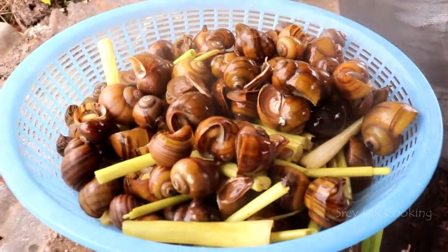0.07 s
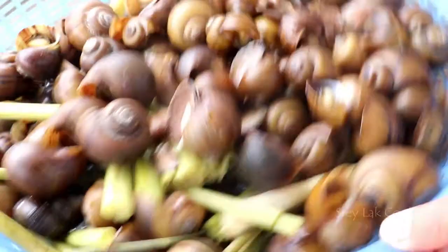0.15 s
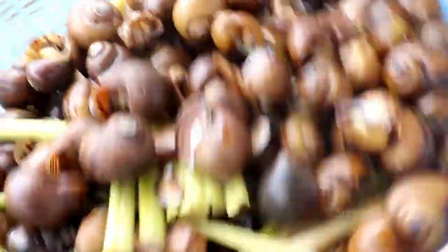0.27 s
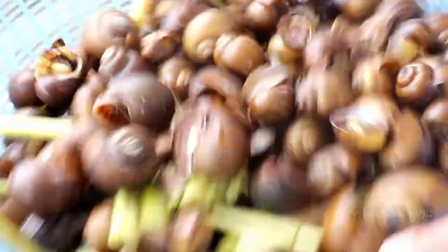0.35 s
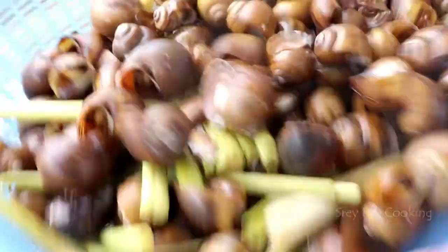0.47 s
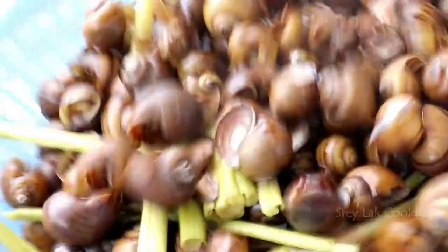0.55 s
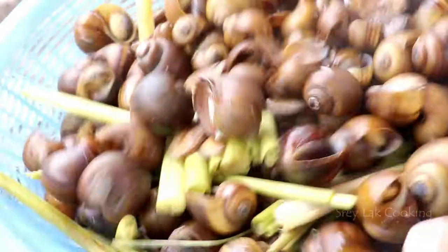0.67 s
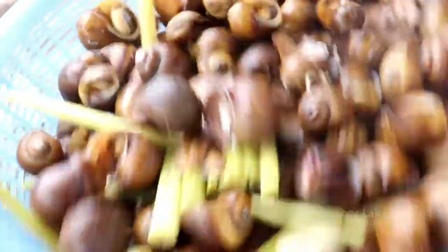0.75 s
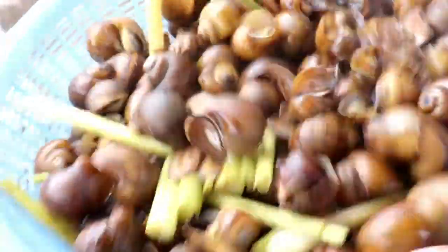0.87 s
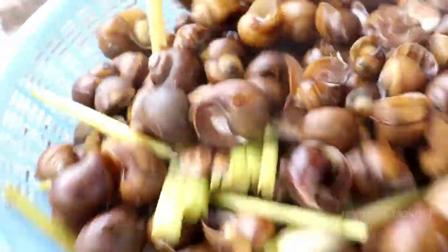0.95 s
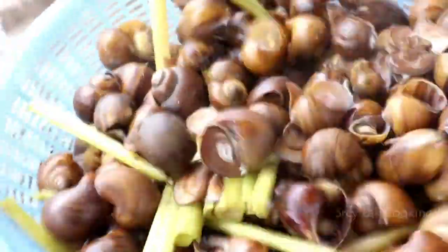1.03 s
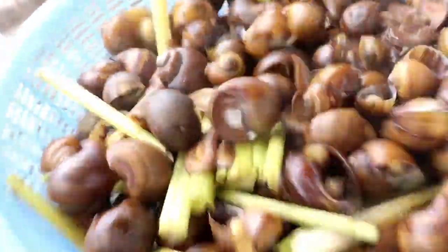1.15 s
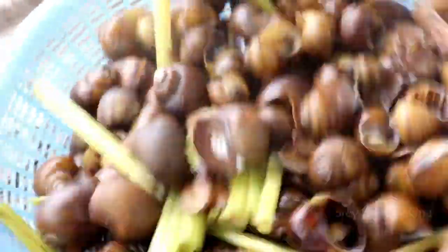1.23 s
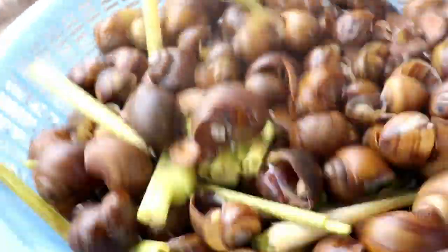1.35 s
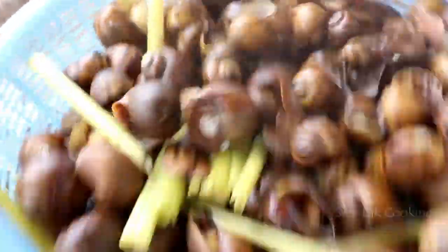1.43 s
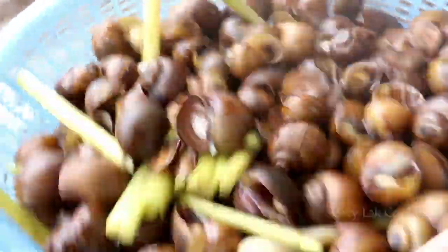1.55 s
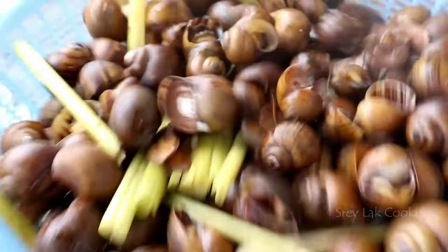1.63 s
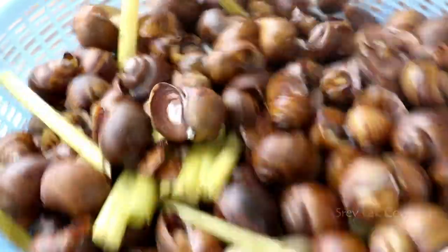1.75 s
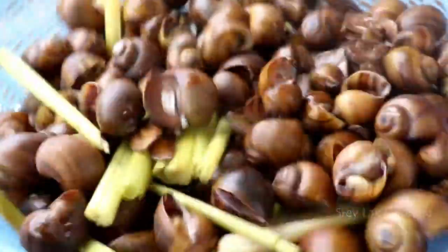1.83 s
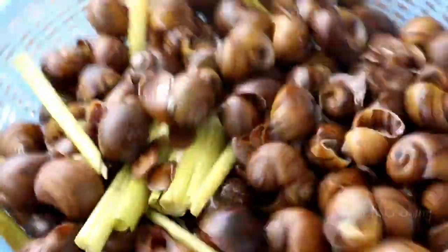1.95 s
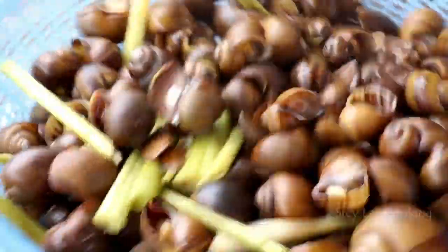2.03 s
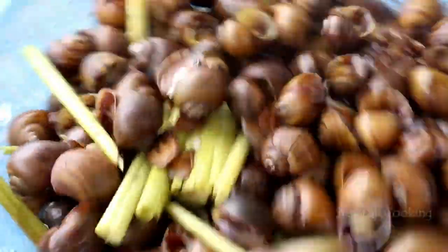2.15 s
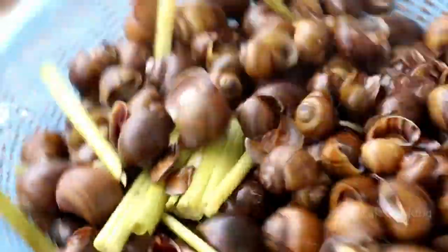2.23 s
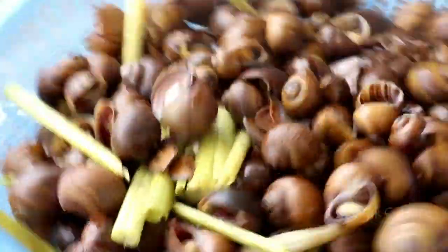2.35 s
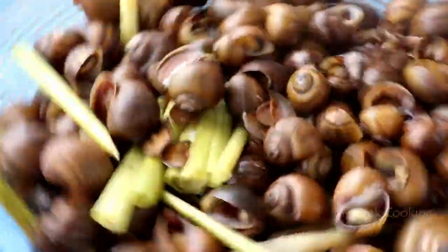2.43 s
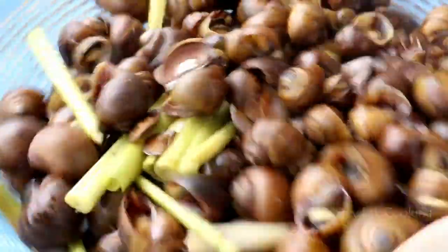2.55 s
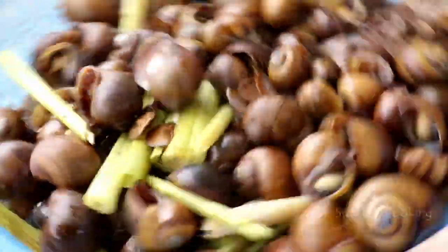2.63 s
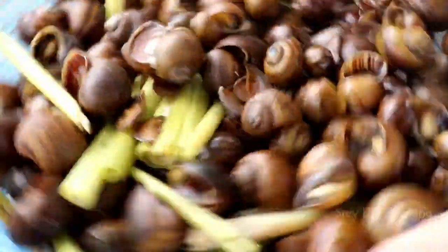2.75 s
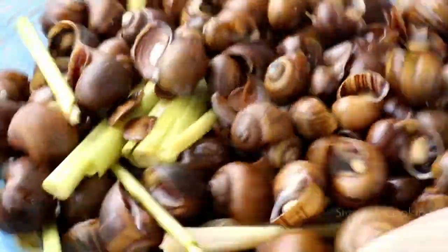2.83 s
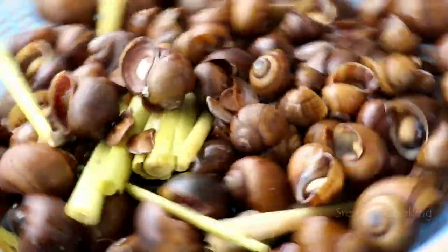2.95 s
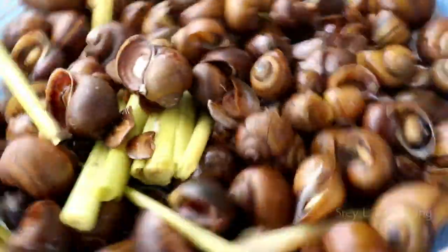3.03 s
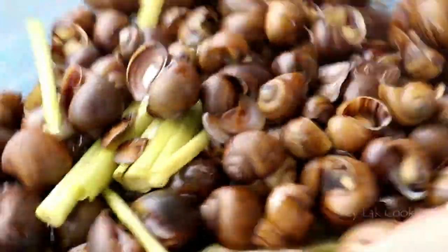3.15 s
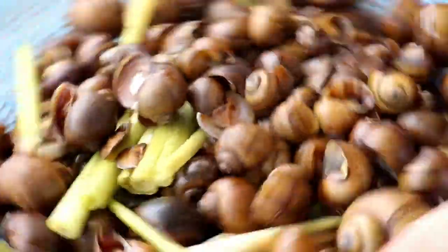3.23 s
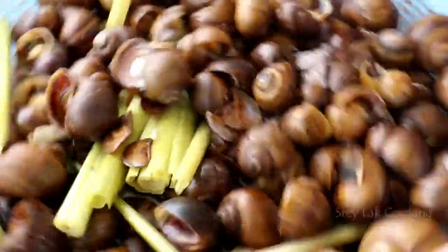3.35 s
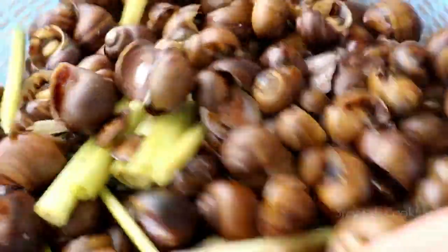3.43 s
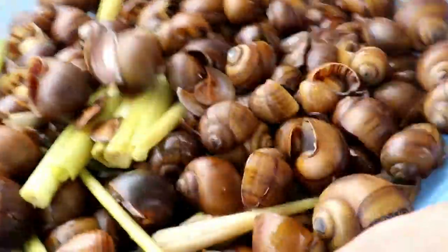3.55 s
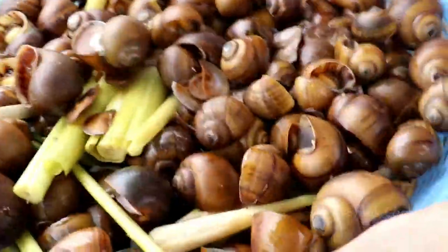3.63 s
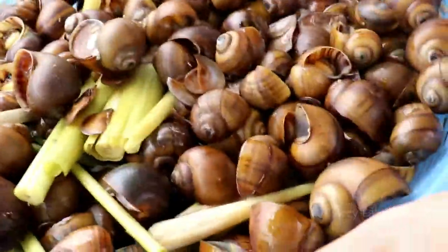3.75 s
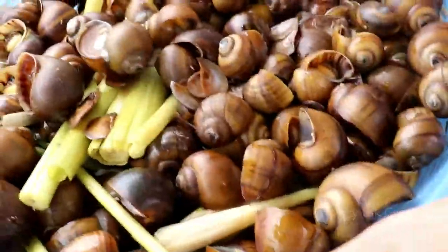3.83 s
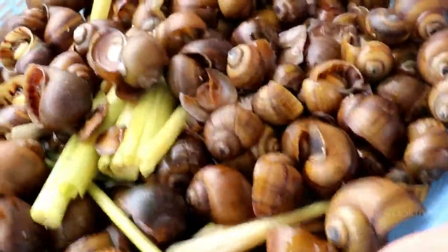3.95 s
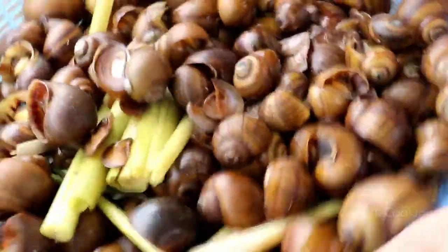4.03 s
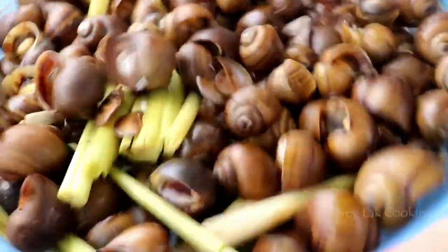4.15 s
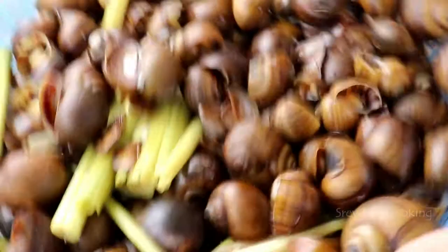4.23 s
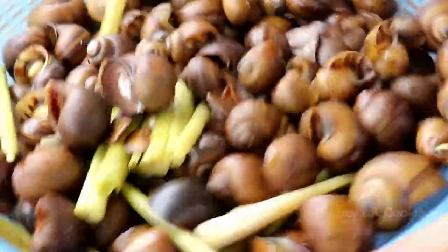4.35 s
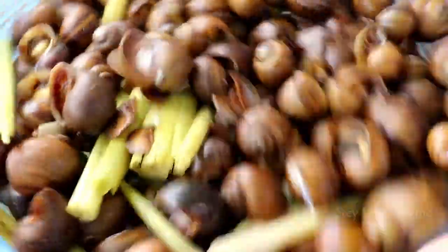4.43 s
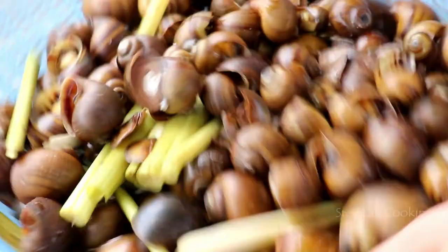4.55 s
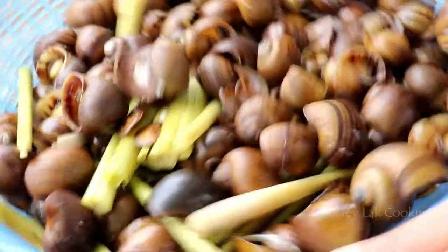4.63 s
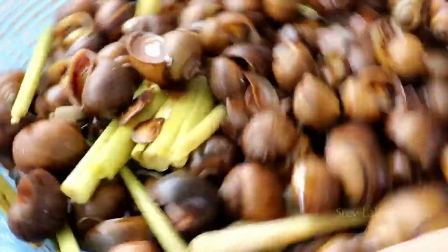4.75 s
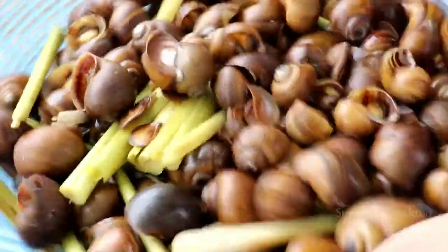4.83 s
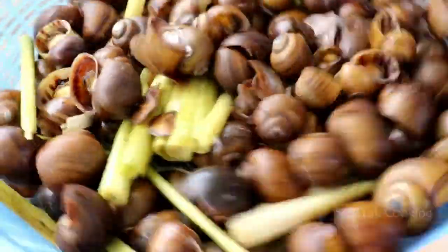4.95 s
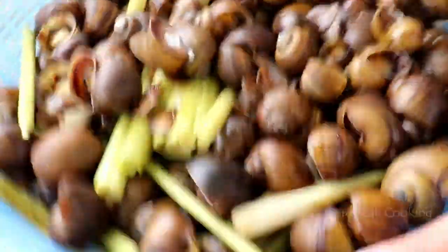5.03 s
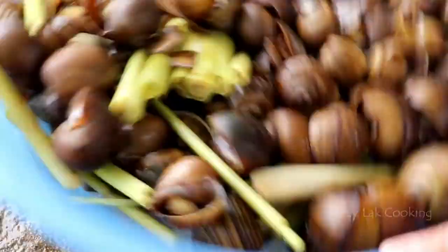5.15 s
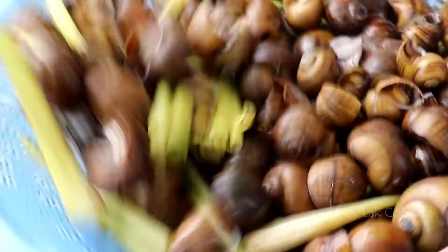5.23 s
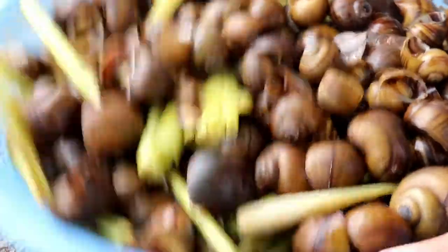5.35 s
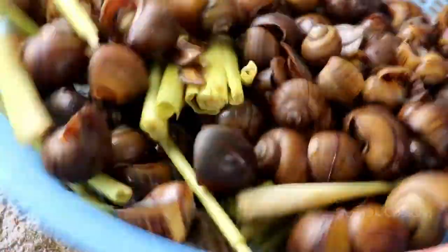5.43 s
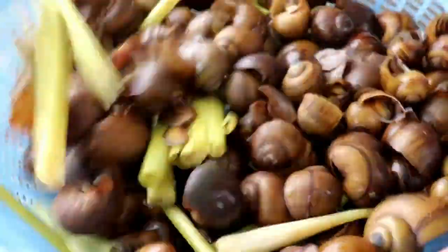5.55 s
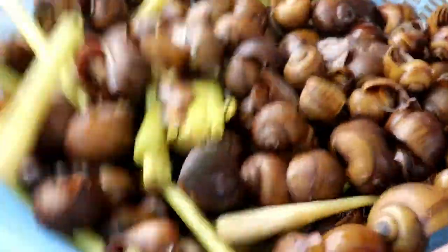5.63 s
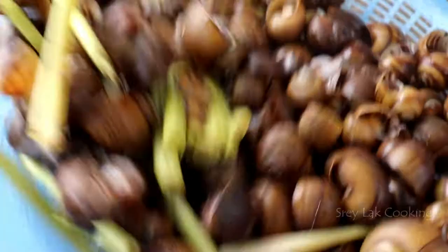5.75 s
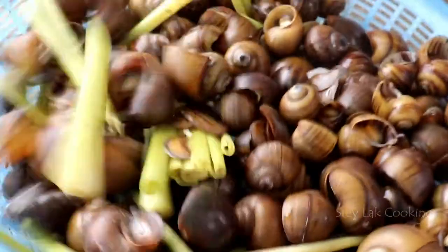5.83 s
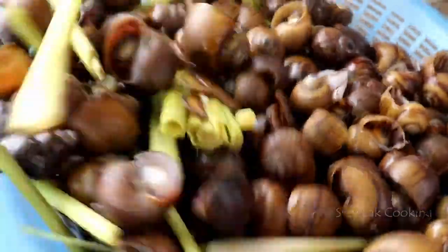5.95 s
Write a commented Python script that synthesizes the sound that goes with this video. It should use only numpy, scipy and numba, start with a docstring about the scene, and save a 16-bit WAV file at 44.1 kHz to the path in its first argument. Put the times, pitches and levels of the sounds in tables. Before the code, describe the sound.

Hollow snail shells rattle and scrape in rhythmic shakes in a plastic colander outdoors, pause while a distant bird hoots, then get tossed.

```python
"""Snail shells in a colander

Boiled snail shells slide out of a pot into a plastic colander, which is rocked, rested and then tossed.
Each stroke sets the heap sliding: random knocks ring damped sines for hollow shells, thin lips and plastic.
Denser knocks make a scrape, and hard clacks stand out on top. Filtered noise gives the outdoor air;
a distant bird hoots in the pause and a small one chirps, both as gliding, nearly pure tones."""
import sys
import numpy as np
from scipy import signal
from scipy.fft import rfft, irfft, next_fast_len
from scipy.io import wavfile
from scipy.ndimage import uniform_filter1d
from numba import njit

SR = 44100
rng = np.random.default_rng(int(sys.argv[2]) if len(sys.argv) > 2 else 0)


def dump(signal):
    """Clip the signal to [-1, 1] and save it as 16-bit WAV at the path in sys.argv[1]."""
    limited = np.clip(np.atleast_2d(signal).T, -1, 1)
    pcm = np.round(limited * 32767).astype(np.int16)
    wavfile.write(sys.argv[1], SR, pcm)


N = 263718  # length [samples]

# rocks of the colander, each a push and a return:
# (start [s], return follows after [s], push level [dB], return level [dB])
ROCKS = [(.051, 0.11, -21, -19.5), (.288, 0.12, -20, -20), (.528, 0.12, -21, -21.5),
         (.795, .118, -21.5, -22), (1.0, .13, -23.5, -22), (1.224, 0.11, -18.5, -18.5),
         (1.466, 0.1, -20, -19), (1.682, 0.11, -21, -20.5), (1.935, 0.11, -19, -19),
         (2.195, 0.14, -19.5, -20), (2.495, 0.14, -20, -19.5), (2.818, 0.14, -20, -19.5),
         (3.13, .112, -20, -20), (3.408, 0.088, -19, -27), (4.095, 0.14, -27, -19), (4.352, 0.15, -20, -20),
         (4.621, 0.14, -19.5, -21.5), (4.89, .15, -21, -39)]
# tilts, where shells keep rolling without a stop: (start [s], length [s], level [dB])
TILTS = [(.055, .9, -24), (1.0, .3, -27), (2.55, .36, -26.5), (4.04, 0.061, -33), (4.72, .24, -23.5)]
# tosses, the whole heap landing at once: (landing [s], length of the spill [s], level [dB])
TOSSES = [(5.163, 0.13, -19.5), (5.492, .087, -17.5), (5.757, .085, -17.5)]
# clacks that stand out: (time [s], strength of the blow [dB], shell pitch [Hz])
HARD_CLACKS = [(.064, -1, 1670), (.24, 0.5, 1880), (.447, -1, 2300), (.753, 0.5, 2660), (.879, -2, 2602),
               (.975, 0, 1720), (1.077, -2.5, 2520), (1.172, 3, 3483), (1.363, -2, 2279),
               (1.481, -2.5, 2441), (1.699, -3, 3460), (1.838, 2.5, 7040), (1.936, -0.5, 4210),
               (2.479, -0.5, 4409), (2.585, -2, 3186), (2.679, -.5, 1391), (2.893, 5.5, 3228),
               (3.061, -1, 4466), (3.183, 1, 1589), (3.266, 0, 3077), (3.309, -0.5, 2480), (3.588, 0, 4320),
               (3.606, -6.5, 4487), (3.675, -14, 2750), (3.726, -14.5, 4246), (3.815, -27, 4100),
               (3.935, -22, 2043), (4.075, -10.5, 2167), (4.141, 2.5, 2485), (4.158, -6.5, 7200),
               (4.176, -3, 3530), (4.189, -6.5, 1856), (4.215, -1, 4070), (4.262, 0, 1621),
               (4.456, 2.5, 3701), (4.52, 0, 2640), (4.568, -4.5, 2098), (4.656, 1.5, 2500),
               (4.947, 1.5, 3734), (4.992, 1, 2021), (5.031, -5.5, 1597), (5.067, -7.5, 4080),
               (5.171, 0, 1320), (5.175, 0.5, 3780), (5.288, 3, 5100), (5.342, -5, 4547),
               (5.408, -18.5, 2320), (5.484, -12, 1108), (5.591, -1.5, 3441), (5.789, -0.5, 1494),
               (5.946, -9, 2770)]
# colour of the microphone: (frequency [Hz], gain [dB])
MIC_COLOUR = [(150, -7), (400, -1), (700, -3.5), (1000, -1), (1700, 0.5), (3000, 1), (4400, 2.5),
              (4950, -0.5), (5350, 3.5), (6100, -3), (7000, 1), (9500, -3), (12000, -2), (16000, 3.5)]
# hoots of a distant bird: (start [s], length [s], pitch before bending [Hz], level [dB])
HOOTS = [(3.557, 0.057, 1143, -33.5), (3.61, 0.058, 1010, -40), (3.756, 0.053, 960, -47),
         (3.842, 0.04, 1070, -36.5), (3.892, 0.053, 1012, -39.5)]
# faint chirps of a small bird: (start [s], length [s], pitch before bending [Hz], level [dB])
CHIRPS = [(3.833, 0.02, 5460, -60), (3.853, 0.016, 5570, -43), (3.96, .016, 5560, -60.5),
          (3.978, 0.021, 5630, -44)]
# spectrum of the outdoor air: (frequency [Hz], relative level per Hz [dB])
AIR_COLOUR = [(15, -9.5), (30, 3), (48, -4.5), (130, -10), (230, -15.5), (450, -23), (1000, -18.5),
              (3000, -29), (5500, -31.5), (6300, -38), (15000, -46.5)]
# swell of the outdoor rumble, before the gusts: (time [s], level [dB])
RUMBLE = [(0, -39.5), (.6, -45), (2, -44), (2.35, -38.5), (2.6, -43.5), (3.7, -39.5), (4.2, -38.5),
          (4.5, -46.5), (5.95, -47)]

# a slide fills this share of the time until the colander turns again; returns have a longest length
PUSH_SHARE, RETURN_SHARE, LONGEST_SLIDE_S = .8, .68, .115
# the push throws the shells against the plastic, the return rolls them over each other
# tone against the slide's level: (colander thud [dB], lip tinkle [dB])
PUSH_TONE_DB, RETURN_TONE_DB = (-11, -11.5), (-11, -10)
TILT_TONE_DB, TOSS_TONE_DB = (-12, -9.5), (-16, -11)
# the plastic knocks louder as the rocking widens, up to the full swing
THUD_DB_PER_S, FULL_SWING_S = 1.7, 1.5
# a toss first slaps the plastic (level against the toss), then the heap spills
SLAP_S, SLAP_DB, SLAP_TONE_DB = .0838, -3, (-2.5, -22)
SPILL_AFTER_S = .018
# lesser clacks within every slide: strength above the slide's level, and range of shell pitches
STRAY_DB, STRAY_SPREAD_DB, STRAY_LOW_HZ, STRAY_HIGH_HZ = 14, .5, 1810, 4700
STRAY_AFTER_S = .02  # the shells must gather speed before they clack
HISS_DB, TOP_HZ = -46.5, 15900


def clatter():
    """Hollow shells clack, their thin lips tinkle, and the plastic underneath knocks dully."""
    _, _, db, thud_db, tinkle_db = slides().T
    strength = motion(db)
    times, sizes = collisions(strength, rate=750, spread_db=2.5)
    hollow = bodies(times, sizes, low_hz=1466, high_hz=5300, cycles=7.4, push=1.24, count=2)
    lips = bodies(times, sizes, low_hz=7270, high_hz=9360, cycles=11, push=23.0, count=1)
    plastic = bodies(times, sizes, low_hz=740, high_hz=1560, cycles=5.4, push=.9, count=2)
    return (undb(-3.0) * driven(hollow, strength)
            + undb(-3) * driven(lips, motion(db + tinkle_db))
            + undb(0.5) * driven(plastic, motion(db + thud_db)))


def slides():
    """Every slide of the heap: (start [s], length [s], level [dB], colander thud [dB], lip tinkle [dB])."""
    rows = [(*tilt, *TILT_TONE_DB) for tilt in TILTS]
    next_starts = [stroke[0] for stroke in ROCKS[1:] + TOSSES[:1]]
    for (start, swing, push_db, return_db), next_start in zip(ROCKS, next_starts):
        turn = start + swing
        widening_db = np.array([THUD_DB_PER_S * min(start - FULL_SWING_S, 0), 0])
        rows.append((start, PUSH_SHARE * swing, push_db, *(widening_db + PUSH_TONE_DB)))
        # before a pause, the return lasts as long as the swing suggests
        paused = next_start - turn > 2 * LONGEST_SLIDE_S
        length = RETURN_SHARE * (swing if paused else next_start - turn)
        rows.append((turn, min(length, LONGEST_SLIDE_S), return_db, *(widening_db + RETURN_TONE_DB)))
    for landing, length, db in TOSSES:
        rows.append((landing, SLAP_S, db + SLAP_DB, *SLAP_TONE_DB))
        rows.append((landing + SPILL_AFTER_S, length, db, *TOSS_TONE_DB))
    return np.array(rows)


def motion(levels_db, rise_s=.018, stop_s=.027, arch=.3, creep_s=0.02597, settle_s=.065,
           loose_db=-12, rest_db=-68):
    """Strength of the sliding: a few shells creep ahead of each stroke, the heap swells and stops, a few settle."""
    power = np.full(N, undb(2 * rest_db))
    for (start, length, *_), db in zip(slides(), levels_db):
        first = max(int(start * SR) - SR // 10, 0)
        span = np.arange(first, min(int(start * SR) + SR // 2, N))
        age = span / SR - start
        early = np.maximum(-age, 0)
        late = np.maximum(age - length, 0)
        swell = 1 + arch * (np.sin(np.pi * np.clip(age / length, 0, 1)) - .5)
        slide = np.clip(age / rise_s, 0, 1) * swell * np.exp(-late / stop_s)
        loose = undb(loose_db) * np.exp(-early / creep_s - late / settle_s)
        power[span] += undb(2 * db) * (slide ** 2 + loose ** 2)
    return np.sqrt(power)


def collisions(strength, rate, spread_db):
    """Random knocks (times, sizes) with scattered hardness, thicker while the heap moves fast."""
    busy = np.minimum(strength / undb(-19), 1.3) ** .75
    at = np.flatnonzero(rng.random(N) < rate * busy / SR)
    hardness = np.clip(rng.standard_normal(len(at)), -2, 1.6)
    return at / SR, undb(spread_db * hardness)


def bodies(times, sizes, low_hz, high_hz, cycles, push, count):
    """Every knock rings a few modes of its own, since no two shells are the same size."""
    out = 0
    for _ in range(count):
        pitch, damping, share, lag = rng.random((len(times), 4)).T
        hz = low_hz * (high_hz / low_hz) ** pitch
        gain = sizes * (2 * share - 1) * np.sqrt(hz / low_hz)
        mode_cycles = cycles * 2 ** (damping - .5)
        # the two shells of a collision answer a moment apart
        out = out + rings(times + .0007 * lag, hz, mode_cycles, gain, float(push))
    return out


@njit
def rings(times, hz, cycles, size, push):
    """One damped sine a knock: it builds over `push` cycles and falls 60 dB in the given cycles."""
    out = np.zeros(N)
    for k in range(len(times)):
        start = int(times[k] * SR)
        step = min(hz[k] / SR, .45)  # cycles per sample
        pole = np.exp(step * (2j * np.pi - 6.9 / cycles[k]))
        z = size[k] + 0j
        for i in range(max(start, 0), min(N, start + int(cycles[k] / step))):
            z *= pole
            contact = min((i - start) * step / push, 1.)
            out[i] += z.imag * contact * contact * (3 - 2 * contact)
    return out


def driven(x, strength):
    """The energy of the slide is shared among the knocks that fall within some 30 ms."""
    size = SR // 32
    local = uniform_filter1d(uniform_filter1d(x ** 2, size), size)
    return x * strength / np.sqrt(np.abs(local) + 0.0083 * np.mean(x ** 2))


def grind():
    """Wet shells rub and scrape between the knocks: thousands of tiny slips a second, in short irregular runs."""
    _, _, db, _, tinkle_db = slides().T
    strength = motion(db)
    times, sizes = collisions(strength, rate=4000, spread_db=1.0)
    hollow = bodies(times, sizes, low_hz=1050, high_hz=5380, cycles=9, push=1.01, count=1)
    lips = bodies(times, sizes, low_hz=6660, high_hz=10720, cycles=21.4, push=3.0, count=1)
    runs_db = 4.5 * walk(220)
    lip_runs_db = 8.86 * np.minimum(walk(160), 2)
    scrape = driven(hollow, strength) + driven(lips, motion(db + tinkle_db)) * undb(lip_runs_db)
    return undb(runs_db - 8.5) * scrape


def pings():
    """Now and then a free lip rings on for a moment."""
    _, _, db, _, tinkle_db = slides().T
    strength = motion(db + tinkle_db, loose_db=-5.5)
    times, sizes = collisions(strength, rate=38, spread_db=1.0)
    sizes = sizes * strength[(times * SR).astype(int)]
    return undb(14) * bodies(times, sizes, low_hz=6900, high_hz=10200, cycles=130, push=8, count=1)


def clacks(hits):
    """A hard blow: one shell rings at its own pitch and rebounds, with a brief crack and its neighbour's modes."""
    times, db, hz = (column.copy() for column in hits.T)
    size = undb(db)
    lip = hz > 6000
    cycles = 13 * (hz / 3000) ** 0.45 + 45 * lip  # small shells ring for more cycles, thin lips far more
    shell = rings(times, hz, cycles, size * undb(-5 * lip), 1.17)
    flight, bounce = rng.random((len(times), 2)).T
    rebound = rings(times + 0.00162 + 0.0029 * flight, hz, cycles, size * bounce, 1.7)
    neighbour = bodies(times, size, low_hz=1224, high_hz=5400, cycles=9.6, push=0.8, count=4)
    # the harder the blow, the brighter its crack
    crack = bodies(times, size ** 1.08, low_hz=6740, high_hz=9850, cycles=22.3, push=1.86, count=2)
    return undb(2.0) * shell + undb(-1.5) * rebound + undb(-4.0) * neighbour + undb(-3.0) * crack


def blows(count):
    """All hard blows, in the columns of HARD_CLACKS: those that stand out, and `count` strays in every slide."""
    start, length, db, _, _ = np.repeat(slides(), count, axis=0).T
    moment, force, pitch = rng.random((len(start), 3)).T
    part = (np.arange(len(start)) % count + moment) / count  # one stray in each equal part of the slide
    times = start + STRAY_AFTER_S + np.maximum(length - STRAY_AFTER_S, 0) * part
    strength_db = db + STRAY_DB + STRAY_SPREAD_DB * (2 * force - 1)
    hz = STRAY_LOW_HZ * (STRAY_HIGH_HZ / STRAY_LOW_HZ) ** pitch
    return np.vstack([HARD_CLACKS, np.column_stack([times, strength_db, hz])])


def jams(hits, depth_db, lead_s, width_s):
    """The heap catches for a moment before a hard clack breaks it loose: a short dip in gain."""
    caught = np.zeros(N)
    for time, *_ in hits:
        span = np.arange(max(int(time * SR) - SR // 20, 0), min(int(time * SR) + SR // 20, N))
        dip = np.exp(-((span / SR - time + lead_s) / width_s) ** 2)
        caught[span] = np.maximum(caught[span], dip)
    return undb(depth_db * caught)


def heap(x, t60_s, scatter_db, size):
    """Knocks scatter through the heap and off the colander, along paths that change as the shells move."""
    pieces = np.pad(x, (0, -N % size)).reshape(-1, size)
    t = np.arange(5 * size) / SR
    # each piece gets its own decaying noise tail of equal energy
    tails = rng.standard_normal((len(pieces), len(t))) * undb(-60 * t / t60_s) * (1 - np.exp(-t / .001))
    tails = tails / np.linalg.norm(tails, axis=1, keepdims=True)
    echoes = signal.fftconvolve(pieces, tails, axes=1)
    out = np.zeros(N + echoes.shape[1])
    for k, echo in enumerate(echoes):
        out[k * size:k * size + len(echo)] += echo
    return x + undb(scatter_db) * out[:N]


def handling(db, lead_s, width_s, top_hz):
    """The jerk of the arms makes a low bump of noise just before each toss lands."""
    t = np.arange(N) / SR
    jerk = sum(np.exp(-((t - landing + lead_s) / width_s) ** 2) for landing, *_ in TOSSES)
    band = signal.butter(2, [22, top_hz], "band", fs=SR, output="sos")
    low = signal.sosfilt(band, rng.standard_normal(N))
    return undb(db) * jerk * low / rms(low)


def bird(notes, bend, fall):
    """Soft, nearly pure notes that arch and sink a little in pitch."""
    out = np.zeros(N)
    for start, length, hz, db in notes:
        u = np.clip((np.arange(N) / SR - start) / length, 0, 1)
        arch = np.sin(np.pi * u)
        pitch = hz * (1 + bend * (arch - 1) - fall * (u - .5))
        phase = 2 * np.pi * np.cumsum(pitch) / SR
        out += undb(db) * arch * (np.sin(phase) + undb(-27) * np.sin(2 * phase))
    return out


def air():
    """Low outdoor rumble that swells and sinks, under a faint even hiss: one noise split at 300 Hz."""
    noise = colour(rng.standard_normal(N), AIR_COLOUR)
    low = signal.sosfiltfilt(signal.butter(2, 300, fs=SR, output="sos"), noise)
    hiss = noise - low
    gust_db = 1.5 * walk(9)
    swell_db = np.interp(np.arange(N) / SR, *np.transpose(RUMBLE)) + gust_db
    return undb(HISS_DB) * hiss / rms(hiss) + undb(swell_db) * low / rms(low)


def undb(db):
    """Decibels to gain."""
    return 10 ** (np.asarray(db) / 20)


def rms(x):
    """Root mean square."""
    return np.sqrt(np.mean(x ** 2))


def walk(rate):
    """Slow random drift with a spread near 1, heading for `rate` new values a second."""
    k = int(SR / rate)
    return uniform_filter1d(np.repeat(rng.standard_normal(N // k + 1), k), k)[:N]


def colour(x, points):
    """Causal (minimum-phase) filter through (frequency [Hz], gain [dB]) points, so that attacks stay sharp."""
    size = next_fast_len(2 * N)
    hz, db = np.transpose(points)
    bins_hz = np.fft.rfftfreq(size, 1 / SR) + 1  # the 1 avoids log(0)
    log_gain = np.log(undb(np.interp(np.log(bins_hz), np.log(hz), db)))
    # folding the cepstrum forward in time makes the filter causal
    cepstrum = irfft(log_gain, size)
    cepstrum[1:size // 2] *= 2
    cepstrum[size // 2 + 1:] = 0
    return irfft(rfft(x, size) * np.exp(rfft(cepstrum)), size)[:N]


def scene():
    """The shells close to the microphone, the garden behind."""
    hits = blows(count=2)
    sliding = clatter() + grind() + pings()
    sliding = sliding * jams(hits, depth_db=-2, lead_s=0.0048, width_s=0.0057)
    shells = heap(sliding + clacks(hits), t60_s=.02, scatter_db=-9, size=256)
    shells = heap(shells, t60_s=.14, scatter_db=-19, size=1024)
    arms = handling(db=-39, lead_s=0.017, width_s=0.034, top_hz=60.03)
    birds = bird(HOOTS, bend=0.038, fall=.08) + bird(CHIRPS, bend=.02, fall=.08)
    return (colour(shells, MIC_COLOUR) + arms + birds + air())[None]


def record(dry):
    """The recorder rounds the highest peaks and cuts the top with a steep low-pass."""
    rounded = dry / (1 + np.abs(dry / .95) ** 4) ** (1 / 4)
    return signal.sosfilt(signal.ellip(8, .2, 70, TOP_HZ, fs=SR, output="sos"), rounded)


dry = scene()
out = record(dry)
dump(out)
```